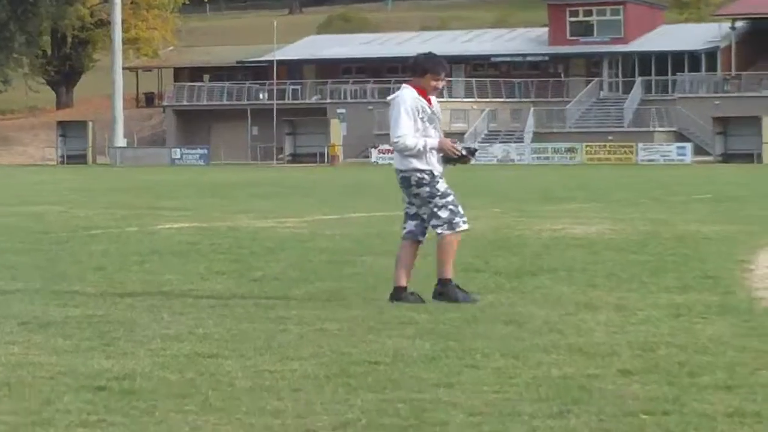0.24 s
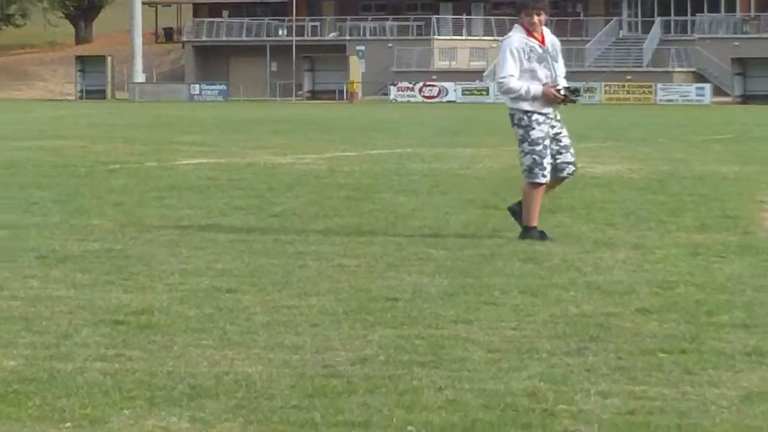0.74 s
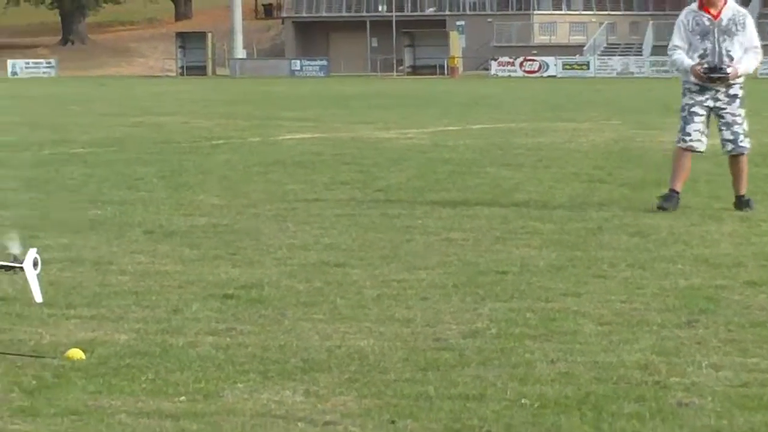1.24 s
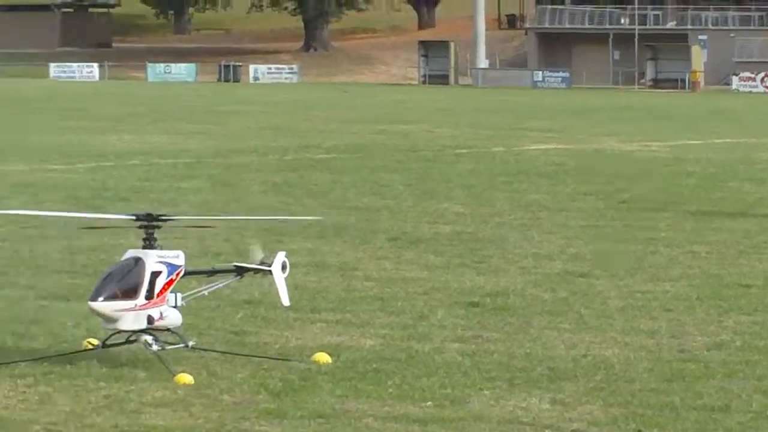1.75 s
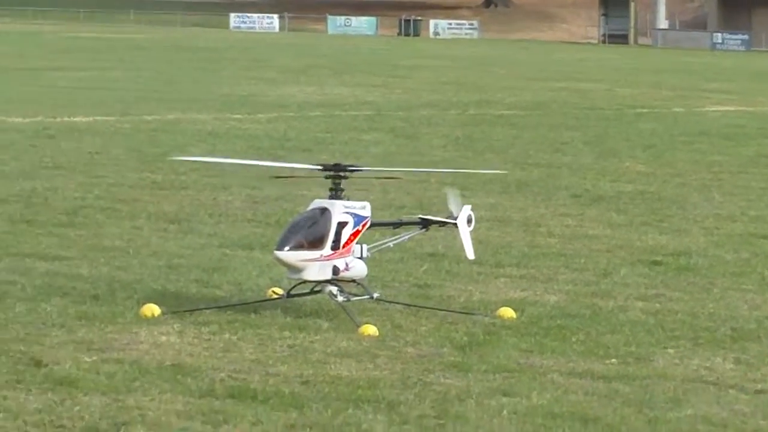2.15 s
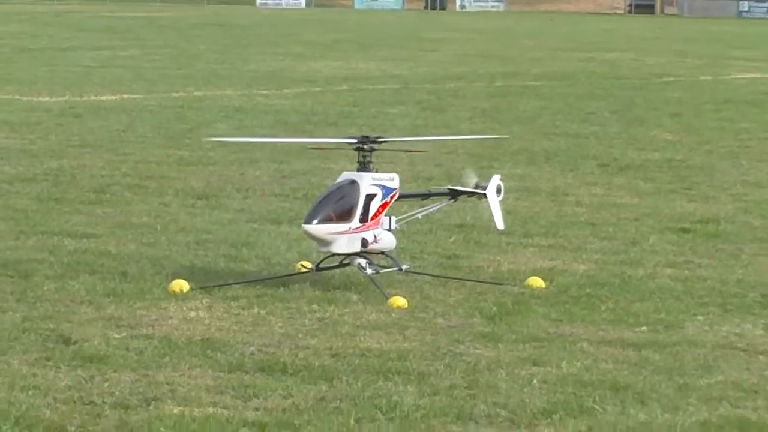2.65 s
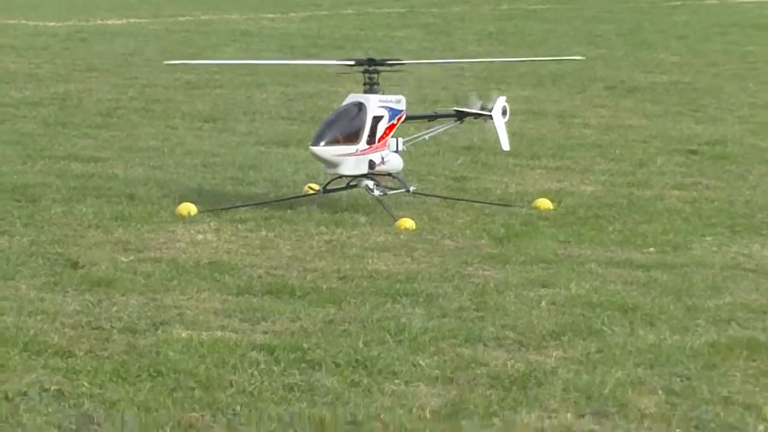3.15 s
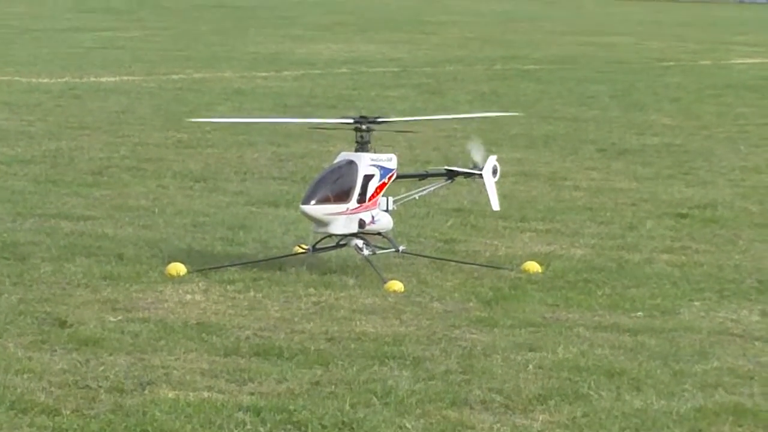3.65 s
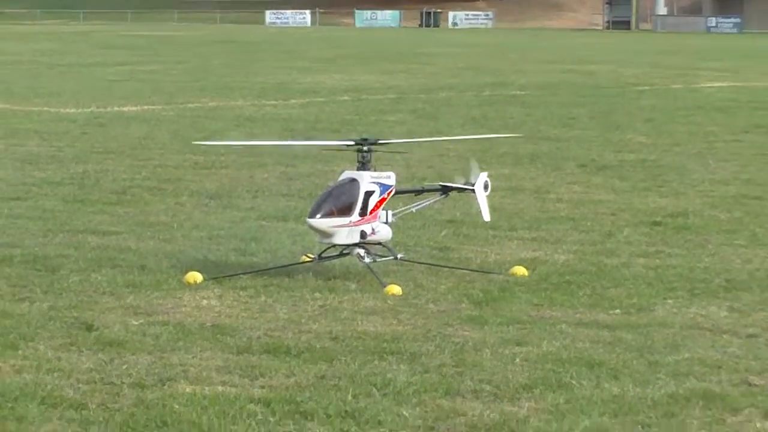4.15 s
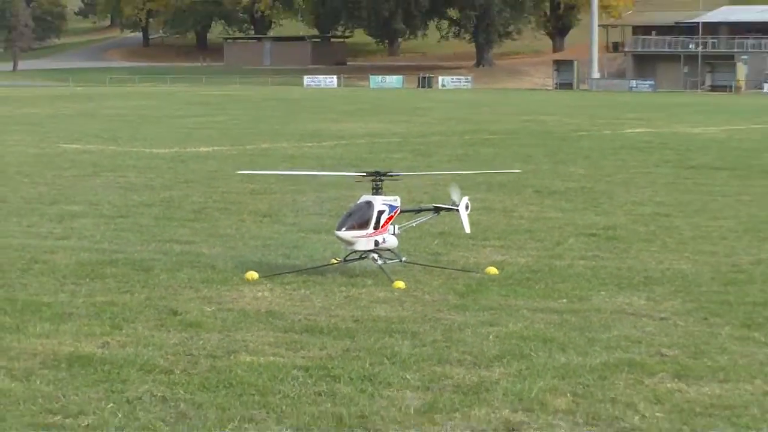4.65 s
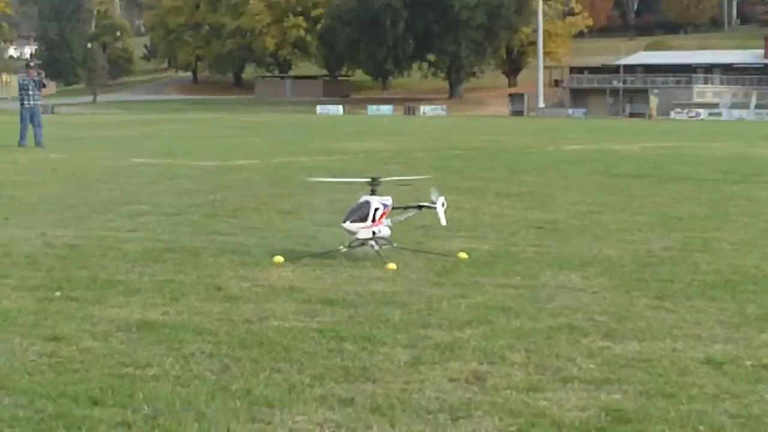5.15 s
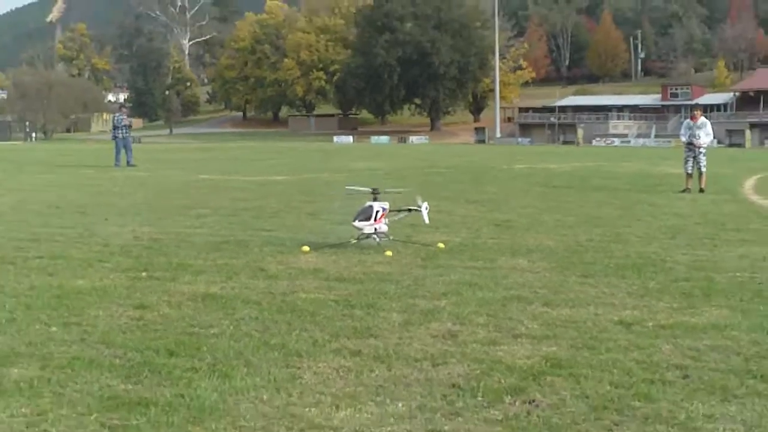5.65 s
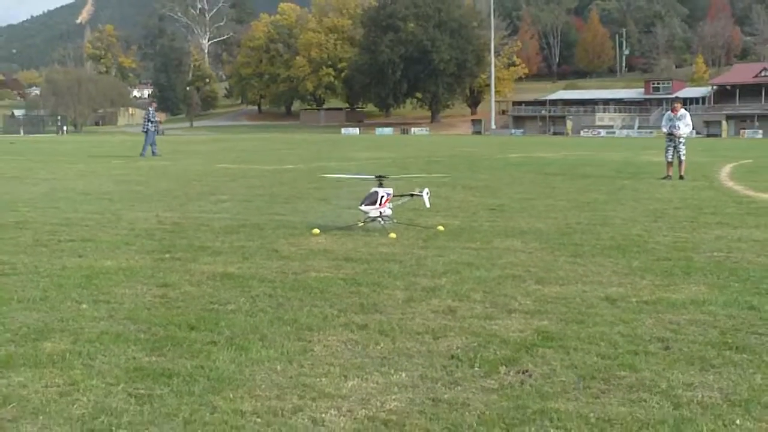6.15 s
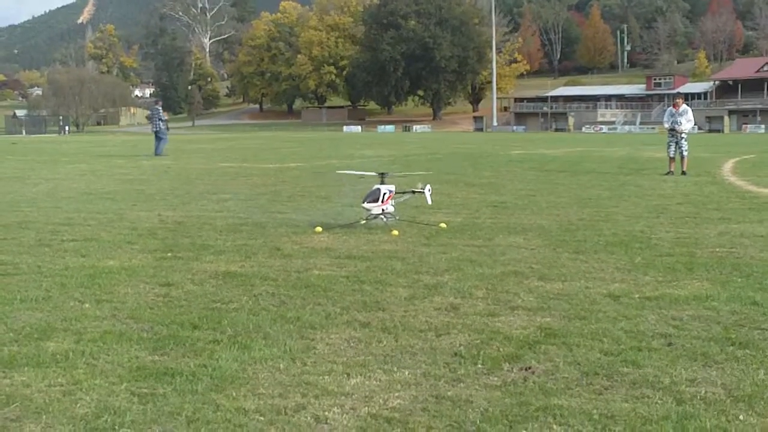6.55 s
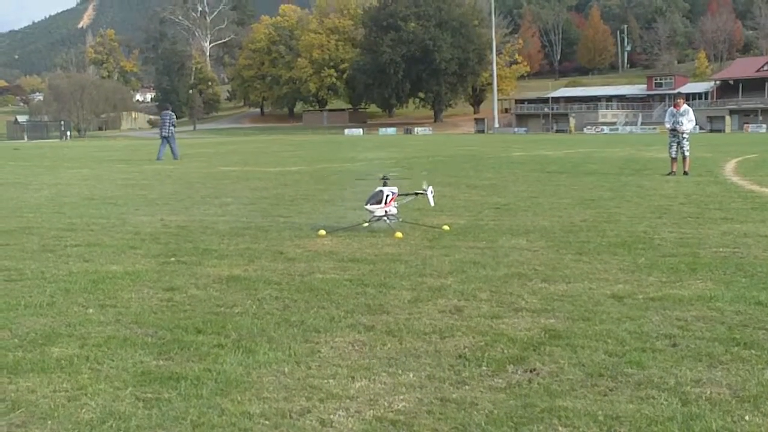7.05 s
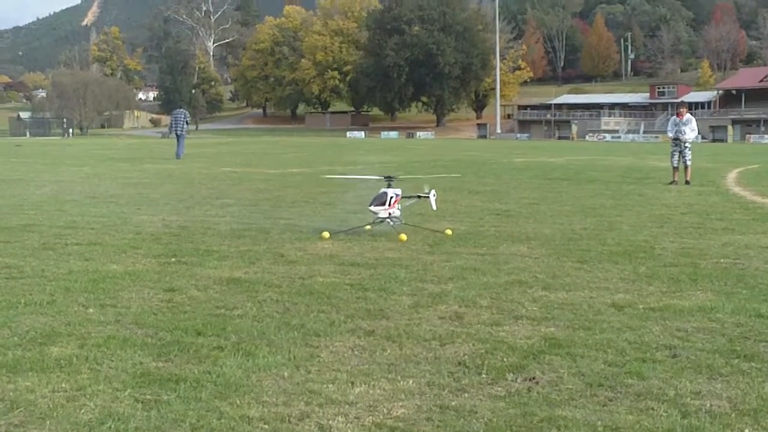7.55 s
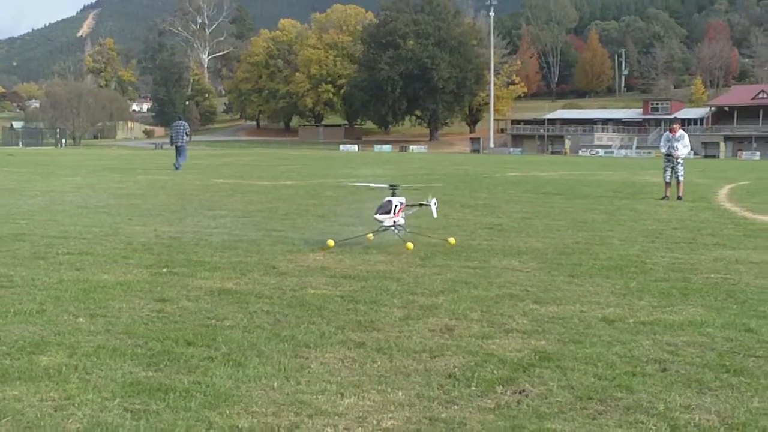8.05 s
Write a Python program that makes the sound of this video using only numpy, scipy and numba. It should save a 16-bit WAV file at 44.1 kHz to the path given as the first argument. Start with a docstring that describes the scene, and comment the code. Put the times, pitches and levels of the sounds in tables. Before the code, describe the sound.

Thin, bright engine whine and rapid rotor swishing from a model helicopter slow a little, then climb steadily in pitch outdoors.

```python
"""Model helicopter spooling up

A small two-stroke helicopter on open grass slows, then spools up, heard some metres off by a thin-sounding microphone.
The exhaust is a series of crank-order tones; the 9-tooth pinion and the fan whine at their own orders.
Gas and cooling air are coloured noise, pulsed by crank and rotor; each of the two main blades gives a rough
tone that whistles upward as it sweeps towards the listener. A few knocks and rustles are filtered noise."""
import sys
import numpy as np
from scipy import signal
from scipy.fft import rfft, irfft
from scipy.io import wavfile
from scipy.ndimage import uniform_filter1d
from numba import njit

SR = 44100
rng = np.random.default_rng(int(sys.argv[2]) if len(sys.argv) > 2 else 0)


def amp(db):
    return 10 ** (np.asarray(db, float) / 20)


def write(x):
    x = np.atleast_2d(x).T
    wavfile.write(sys.argv[1], SR, np.round(np.clip(x, -1, 1) * 32767).astype(np.int16))


N = 366030
TIME = np.arange(N) / SR
LOW_SPEED_HZ, HIGH_SPEED_HZ = 171, 196  # crank turns per second at closed and full throttle
WASH_PEAK_TURNS = 0.62  # rotor position at which the wash stirs the air most


def colour(x, points):
    """Linear filtering: weights the spectrum by (Hz, dB) points joined on a log-frequency axis."""
    hz, db = np.transpose(points)
    bin_hz = np.arange(N // 2 + 1) * SR / N
    gain_db = np.interp(np.log(bin_hz + 1), np.log(hz), db)
    return irfft(rfft(x) * amp(gain_db), N)


def unit(x):
    """Normalisation: scales a signal to rms 1."""
    return x / np.sqrt(np.mean(np.abs(x) ** 2))


def walk(rate_hz):
    """Low-pass noise: a smooth random wander of spread 1, from noise averaged twice."""
    size = int(SR / rate_hz)
    once = uniform_filter1d(rng.standard_normal(N), size)
    return unit(uniform_filter1d(once, size))


def follow(points):
    """Linear interpolation: a (time, value) table read out along the scene."""
    return np.interp(TIME, *np.transpose(points))


def partial(turns, rough, rate_hz):
    """Narrow-band modulation: a steady tone plus a randomly modulated part that smears its line."""
    rough = np.clip(rough, 0, 1)
    wander = walk(rate_hz) + 1j * walk(rate_hz)
    shape = np.sqrt(1 - rough) + np.sqrt(rough / 2) * wander
    return np.sqrt(2) * np.real(shape * np.exp(2j * np.pi * turns))


def swing(turns, depth, peak_turns=0):
    """Amplitude modulation: a gain that rises and falls once a turn."""
    return 1 + depth * np.cos(2 * np.pi * (turns - peak_turns))


@njit
def svf(x, hz, width_hz):
    """State-variable resonance: a band-pass whose centre may move, with gain 1 there."""
    y, b, l = np.empty(len(x)), 0., 0.
    for i in range(len(x)):
        g, k = np.tan(np.pi * hz[i] / SR), width_hz / hz[i]
        v = (b + g * (x[i] - l)) / (1 + g * (g + k))
        b, l, y[i] = 2 * v - b, l + 2 * g * v, k * v
    return y


def steep(x, hz, width_hz):
    """Cascaded resonance: the same fixed band-pass applied twice."""
    centre_hz = np.full(N, 1. * hz)
    return svf(svf(x, centre_hz, width_hz), centre_hz, width_hz)


def patchy(x, spread_db):
    """Spectro-temporal modulation: small patches of time and pitch flicker; the weakest are lowered further."""
    extra_db, extra_start = 8, 1.0  # further dB per unit of field below -extra_start
    spectrum = signal.stft(x, nperseg=1024)[2]
    field = rng.standard_normal(spectrum.shape)
    field = uniform_filter1d(field, 5, axis=0)  # across frequency
    field = unit(uniform_filter1d(field, 3, axis=1))  # across time
    extra = extra_db * np.maximum(-field - extra_start, 0)
    return signal.istft(spectrum * amp(spread_db * field - extra), nperseg=1024)[1][:N]


# dry knocks: start_s, peak_db, centre_hz, t60_s
KNOCKS = [(5.741, -13, 1500, .012), (5.7447, -6, 2000, .012), (5.793, -27, 1400, .02)]
# rustles near the microphone: middle_s, level_db, centre_hz, half_length_s
RUSTLES = [(0.027, -31, 1550, 0.0094), (0.335, -32.5, 1480, 0.07), (0.345, -31, 3000, 0.045),
           (3.04, -38.5, 1490, 0.09)]


def small_noises():
    """Resonant excitation: knocks are decaying noise with a sharp start, rustles swell, fade and waver."""
    out = np.zeros(N)
    for start_s, db, hz, t60_s in KNOCKS:
        click = 4.5 * (np.arange(N) == int(start_s * SR) + 1)
        decay = (TIME >= start_s) * np.exp(-np.log(1000) * np.abs(TIME - start_s) / t60_s)
        knock = steep(decay * (rng.standard_normal(N) + click), hz, 1500.0)
        out += amp(db) * knock / np.abs(knock).max()
    for middle_s, db, hz, half_s in RUSTLES:
        grainy_gain = amp(db + 3.0 * walk(90.))
        swell = np.exp(-((TIME - middle_s) / half_s) ** 2)
        out += grainy_gain * swell * unit(steep(rng.standard_normal(N), hz, 0.5 * hz))
    return out


# air noise against throttle: throttle (0-1), hiss_db, fan_whine_db
THROTTLE_LEVELS = [(0, -23.5, -58), (0.198, -22.5, -40), (.5, -21, -35.5), (.75, -20.5, -31.5),
                   (0.999, -19.5, -29.5)]


def air_levels(throttle):
    """Flow noise grows with load: the hiss and fan levels in dB at each throttle opening."""
    opening, hiss_db, fan_db = np.transpose(THROTTLE_LEVELS)
    return np.interp(throttle, opening, hiss_db), np.interp(throttle, opening, fan_db)


# hiss spectrum at closed and at full throttle: frequency_hz, relative_level_db
HISS_LOW = [(60, -72), (150, -39), (290, -36), (450, -19.5), (800, -18.5), (1000, -19), (1500, -11.5),
            (2400, -7), (3300, -2.5), (3900, -6), (5000, 0.5), (6400, -1), (6900, -2), (7300, -12),
            (7600, -51.5)]
HISS_HIGH = [(60, -73), (150, -42.5), (290, -41), (450, -28.5), (800, -24), (1050, -23), (1500, -13.5),
             (2400, -6.5), (3400, -3), (4200, -1.5), (4800, -7), (5600, 3.5), (6400, -6.5), (6900, -6),
             (7300, -31), (7600, -53)]
# weighting of the part that repeats, weaker at both ends: frequency_hz, gain_db
REPEAT_COLOUR = [(300, -5.5), (2600, -0.5), (3600, 0.5), (4400, -9), (7500, -8)]


def hiss(crank, rotor, throttle, db):
    """Flow noise: gas and air puffed once a firing, stirred by the wash, partly alike from turn to turn."""
    repeat = 0.33  # share that comes again one crank turn later
    puff = swing(crank, 0.084) + swing(rotor, 0.11, WASH_PEAK_TURNS) - 1
    low = unit(colour(puff * rng.standard_normal(N), HISS_LOW))
    high = unit(colour(puff * rng.standard_normal(N), HISS_HIGH))
    air = patchy(np.sqrt(1 - throttle) * low + np.sqrt(throttle) * high, spread_db=1.5)
    repeating = colour(air, REPEAT_COLOUR)
    turn_samples = 1 / np.gradient(crank)
    sample = np.arange(N)
    one_ago = np.interp(sample - turn_samples, sample, repeating)
    two_ago = np.interp(sample - 2 * turn_samples, sample, repeating)
    return amp(db) * unit(air + repeat * one_ago + repeat ** 2 * two_ago)


# tooth mesh and its overtone, before the swell: time_s, level_db
MESH = [(0, -42), (.8, -44.5), (3.498, -44), (4.2, -38), (5.099, -41.5), (5.5, -37.5), (6.299, -49.5),
        (6.901, -35.5), (7.5, -35), (7.75, -27), (8.0, -29.5), (8.3, -32)]
MESH_OVERTONE = [(0, -31), (1.299, -32), (2.199, -38.5), (3.5, -34), (4.3, -29.5), (5.2, -31), (5.8, -27.5),
                 (6.4, -30.5), (6.999, -29), (7.5, -30.5), (7.8, -25.5), (8.0, -35.5), (8.3, -32.5)]


def gears(crank, rotor, throttle, fan_db):
    """Tooth-mesh frequency: teeth times crank rate, swelling once a turn of the untrue main gear; plus fan whine."""
    pinion_teeth, fan_order = 9, 28
    loaded_share = 0.3  # share of the light-load rattle left at full throttle
    slack = 1 - (1 - loaded_share) * throttle ** 2
    crank = crank + 0.006 * slack * walk(70.0)  # turns of backlash: the teeth wander in their play
    mesh = partial(pinion_teeth * crank, 0.4 * slack, 130.0) * swing(rotor, 0.4, 0.77)
    overtone = partial(2 * pinion_teeth * crank, 0.45 * slack, 110.0) * swing(rotor, 0.17, 0.3)
    fan = partial(fan_order * crank, 0.8, 130.0) * swing(rotor, 0.35, WASH_PEAK_TURNS)
    return amp(follow(MESH)) * mesh + amp(follow(MESH_OVERTONE)) * overtone + amp(fan_db) * fan


# crank orders of the exhaust and casing tones: order (cycles per crank turn)
TONE_ORDERS = [1, 4, 4.5, 5, 6, 7, 8, 10, 11, 12, 13, 14, 15, 16, 17, 19, 20, 21, 22, 23, 24, 26, 27]
# their levels, one row per order: closed_throttle_db, half_throttle_db, full_throttle_db
TONES = [(-66, -62.5, -60.5), (-50, -47, -43.5), (-84.5, -70, -57.5), (-48, -44, -48),
         (-49.5, -49.5, -46.5), (-54, -50.5, -48), (-61, -51.5, -40.5), (-46.5, -37.5, -52.5),
         (-48, -49, -38.5), (-44.5, -44, -36), (-50, -36.5, -57.5), (-37, -38, -41), (-38.5, -46, -44),
         (-42, -40.5, -36.5), (-51.5, -36, -33.5), (-34, -29.5, -39), (-35.5, -36, -45),
         (-36.5, -44.5, -62), (-50.5, -49, -48), (-39, -43, -45), (-40, -38, -38.5), (-38.5, -34, -38),
         (-35, -58, -46)]
# second order against crank speed: speed_hz, level_db
SECOND_ORDER = [(173.7, -59), (169.6, -60.5), (182, -52.5), (186, -47.5), (191.7, -44.5), (194, -49.5)]
# third order, drifting on its own: time_s, level_db
THIRD_ORDER = [(0, -48), (.7, -47.5), (2.0, -59), (2.9, -47), (3.8, -54.5), (4.2, -73), (5.5, -57.5),
               (6.2, -54.5), (7.3, -41.5), (8.3, -45)]


def exhaust(crank, speed, throttle):
    """Fourier series of a pulse train: orders locked to the crank, most smeared at the top."""
    firing = crank + 0.008 * walk(50.0)  # turns; each firing comes a little early or late
    second_db = np.interp(speed, *np.transpose(SECOND_ORDER))
    out = amp(second_db) * partial(2 * firing, 0.0063, 43.0)
    out = out + amp(follow(THIRD_ORDER)) * partial(3 * firing, 0.063, 90.0)
    for order, levels_db in zip(TONE_ORDERS, TONES):
        lag_turns = 0.045 * order ** 2  # the muffler spreads the pop in time
        tone = partial(order * firing - lag_turns, 0.002 * order ** 2, 290.0)
        out = out + amp(np.interp(throttle, (0, 0.5, 1), levels_db)) * tone
    return out


# whistle of each blade, before its scatter and sweep: time_s, level_db
BLADE_A = [(0, -20.5), (.4, -27.5), (.7, -27), (1.0, -23), (1.6, -21), (2.3, -23), (2.999, -23.5),
           (4.201, -21.5), (5.398, -20.5), (5.899, -27), (7.199, -37), (8.3, -31)]
BLADE_B = [(0, -27.5), (1, -28.5), (2.9, -31), (3.8, -23.5), (4.3, -21.5), (5.4, -22.5), (6.0, -23),
           (6.7, -20.5), (7.2, -19.5), (7.8, -17.5), (8.0, -21.5), (8.3, -20)]


def blade(speed, turn, levels):
    """Edge tone: one blade whistles while it advances, its pitch rising with tip speed and through the sweep."""
    whistle_hz, speed_power = 5830, 0.7  # pitch at LOW_SPEED_HZ in mid-sweep, and its growth with speed
    sweep_in_turns, sweep_out_turns = 0.13, 0.1  # fades in a little slower than out
    rough = 0.5
    angle = (turn + 0.5) % 1 - 0.5  # rotor turns from mid-sweep
    centre_hz = whistle_hz * (speed / LOW_SPEED_HZ) ** speed_power * (1 + 0.25 * angle)
    tone = partial(np.cumsum(centre_hz) / SR, rough, 1000.0)
    upper = partial(np.cumsum(1.12 * centre_hz) / SR, rough, 810.0)  # fainter second whistle
    tone = tone + amp(-6) * upper
    sweep = np.exp(-(angle / np.where(angle < 0, sweep_in_turns, sweep_out_turns)) ** 2)
    scatter_db = 1.0 * walk(21.0)
    return amp(follow(levels) + scatter_db) * sweep * tone


# cancellations via the ground: centre_hz, width_hz, nominal_depth (0-1)
DIPS = [(1013, 60, 0.8), (1998, 194, 0.7), (2449, 290, 1), (4820, 250, 0.3)]


def ground(sound):
    """Destructive interference: the grass reflection is reduced to a few narrow dips, depth varied at random."""
    for hz, width_hz, depth in DIPS:
        random_depth = np.clip(depth * (1 + 0.35 * walk(42.0)), 0, 1)  # makes these bands flicker
        sound = sound - random_depth * svf(sound, np.full(N, 1. * hz), 1. * width_hz)
    return sound


# crank speed, coasting down to about 3 s, then climbing with a pause near 6.2 s: time_s, speed_hz
SPEED = [(0.0, 181.1), (0.21, 178.5), (0.83, 175.95), (1.66, 173.05), (2.49, 171.3), (2.95, 170.9),
         (3.53, 171.5), (3.735, 172.3), (3.943, 175.2), (4.15, 176.7), (5.395, 182.05), (5.75, 184.2),
         (6.02, 184.6), (6.3, 183.95), (6.64, 184.8), (7.26, 189.9), (8.0, 197.4), (8.3, 198.4)]


def scene():
    """Kinematic coupling: one crank speed drives every rotating source, so all pitches move together."""
    speed = follow(SPEED)
    crank = np.cumsum(speed) / SR  # turns
    rotor = 0.10222 * crank  # geared-down rotor turns
    throttle = np.clip((speed - LOW_SPEED_HZ) / (HIGH_SPEED_HZ - LOW_SPEED_HZ), 0, 1)
    # coasting takes only a third or so of the throttle that would hold the speed
    throttle = throttle * np.where(TIME < 3, 0.33, 1)
    hiss_db, fan_db = air_levels(throttle)
    air = hiss(crank, rotor, throttle, hiss_db)
    blades = blade(speed, rotor + 0.012, BLADE_A) + blade(speed, rotor + 0.54, BLADE_B)
    engine = exhaust(crank, speed, throttle) + gears(crank, rotor, throttle, fan_db)
    heard = ground(air + blades + engine)
    return np.tile(heard + small_noises(), (2, 1))


def thin_out(x):
    """Spectro-temporal gating: above 1 kHz, narrow bands far under their neighbours drop out for a moment."""
    hz, _, spectrum = signal.stft(x, SR, nperseg=1024)
    power = np.abs(spectrum) ** 2
    band = uniform_filter1d(power, size=3, axis=-2)
    around = uniform_filter1d(power, size=40, axis=-2)
    weak = (band < around * amp(-2 * 8)) & (hz[:, None] > 1000)  # 8 dB under
    return signal.istft(spectrum * ~weak, SR, nperseg=1024)[1][..., :N]


def roll_off(x):
    """The treble ends steeply here."""
    return signal.sosfilt(signal.butter(12, 7880, fs=SR, output="sos"), x)


def record(dry):
    """Band limitation: the microphone lacks deep bass and the recorder cuts the top steeply; both channels alike."""
    bottom = signal.butter(4, 125, "high", fs=SR, output="sos")
    top = signal.ellip(10, 0.5, 80, 7540, fs=SR, output="sos")
    limited = signal.sosfilt(top, signal.sosfilt(bottom, dry[:1]))
    mix = np.tile(thin_out(limited), (2, 1))
    return roll_off(mix)


dry = scene()
out = record(dry)
write(out)
```